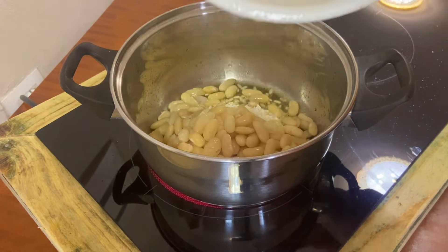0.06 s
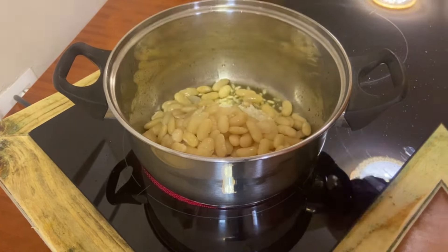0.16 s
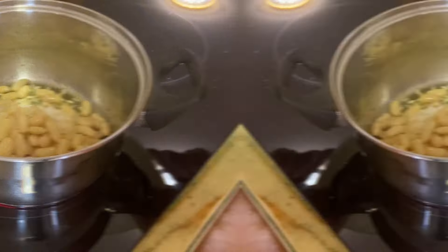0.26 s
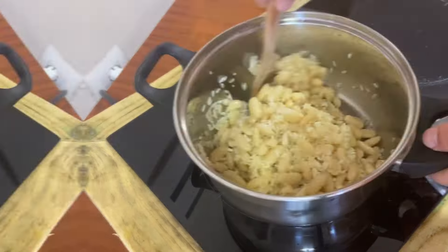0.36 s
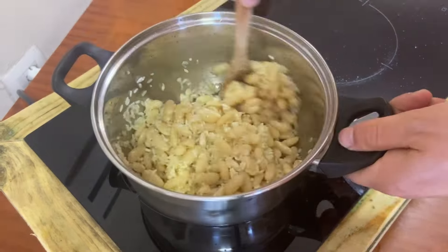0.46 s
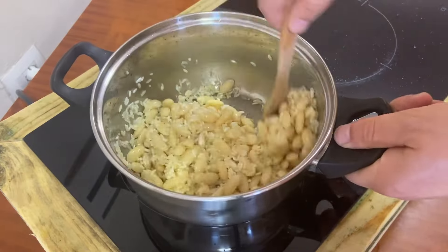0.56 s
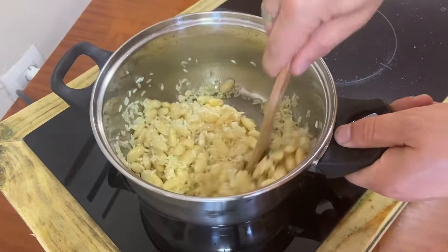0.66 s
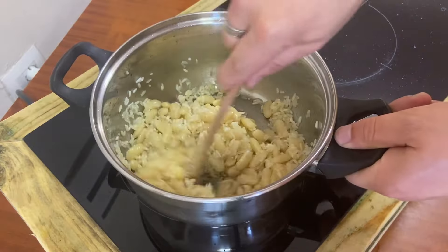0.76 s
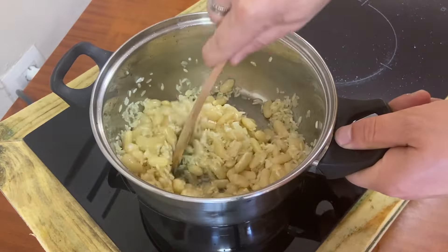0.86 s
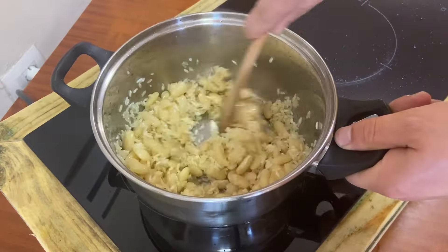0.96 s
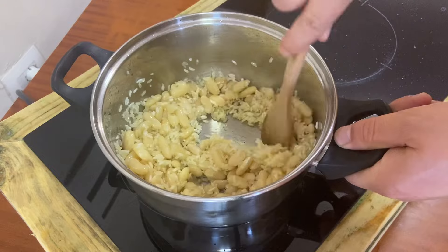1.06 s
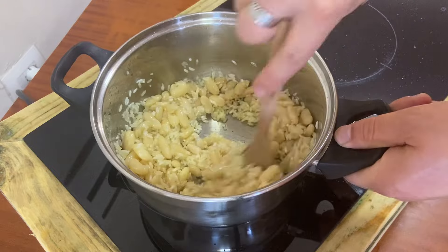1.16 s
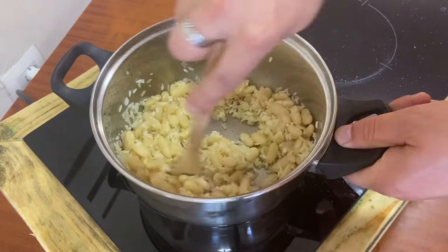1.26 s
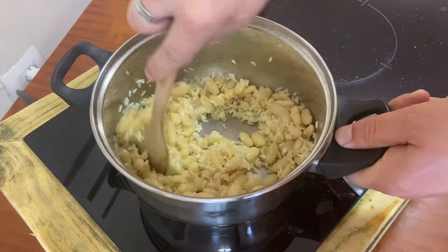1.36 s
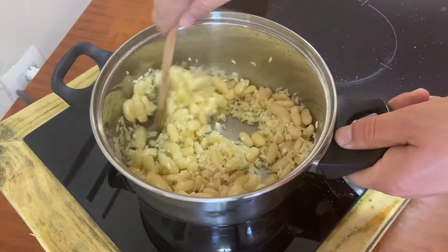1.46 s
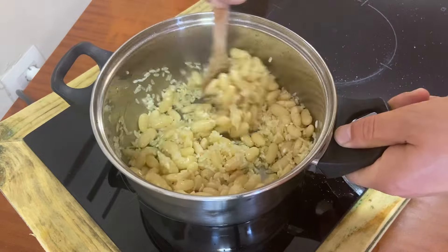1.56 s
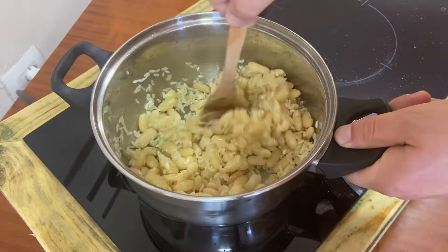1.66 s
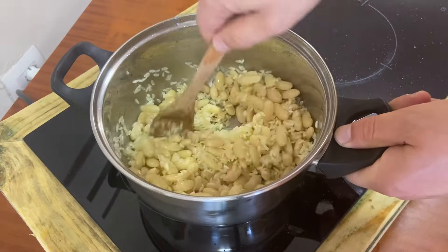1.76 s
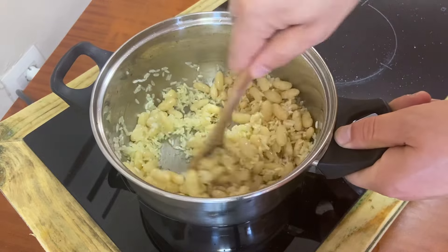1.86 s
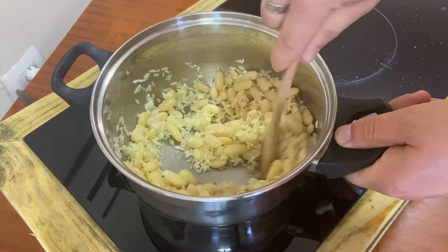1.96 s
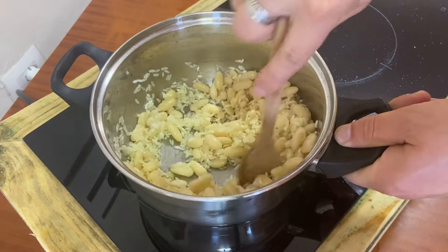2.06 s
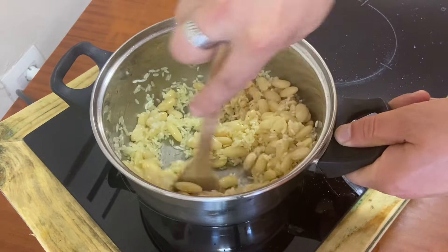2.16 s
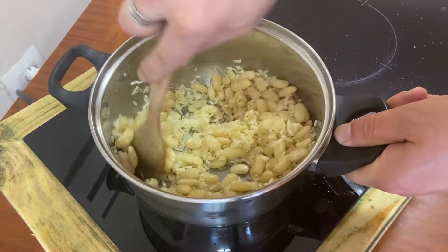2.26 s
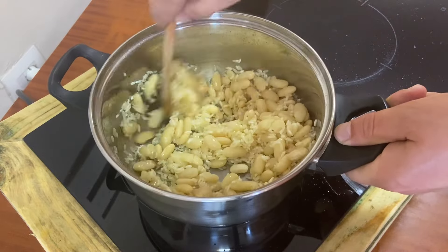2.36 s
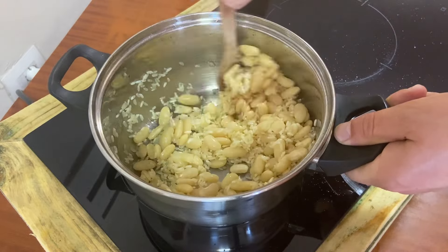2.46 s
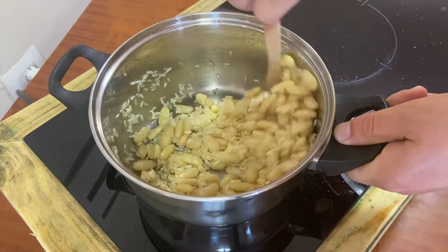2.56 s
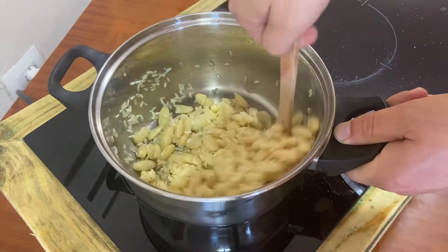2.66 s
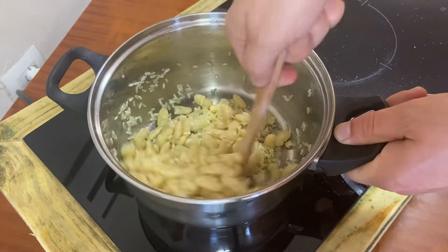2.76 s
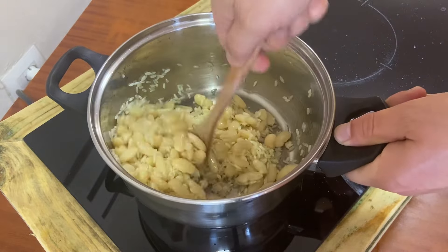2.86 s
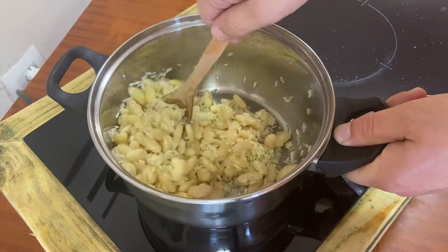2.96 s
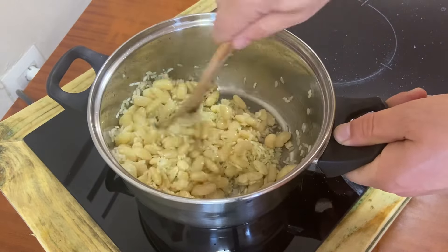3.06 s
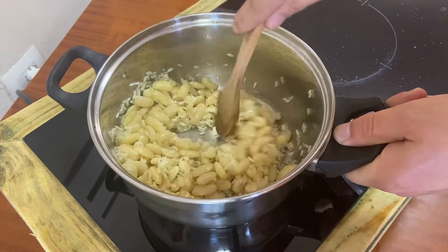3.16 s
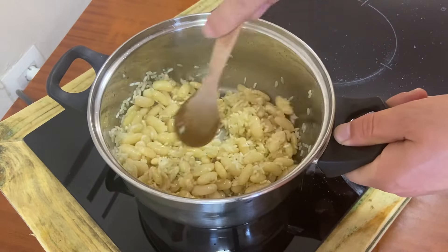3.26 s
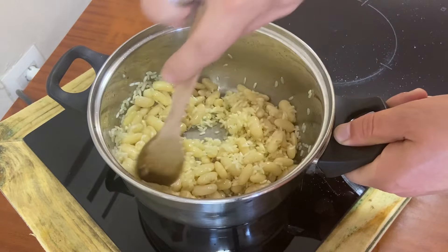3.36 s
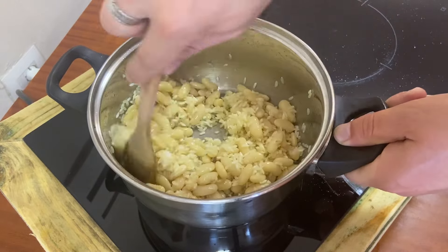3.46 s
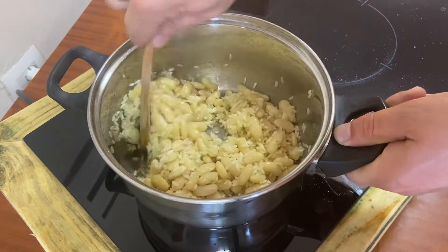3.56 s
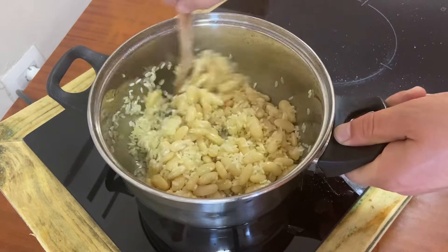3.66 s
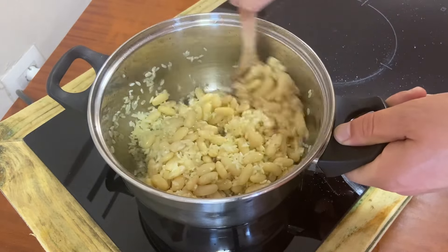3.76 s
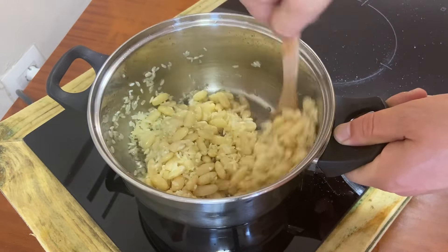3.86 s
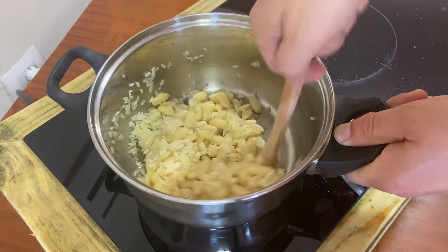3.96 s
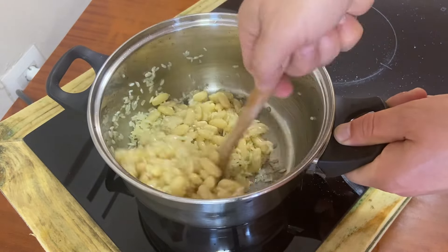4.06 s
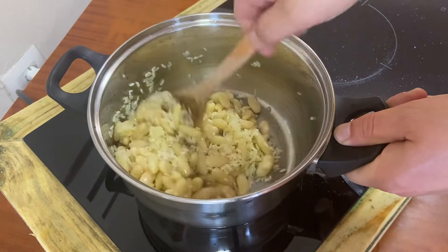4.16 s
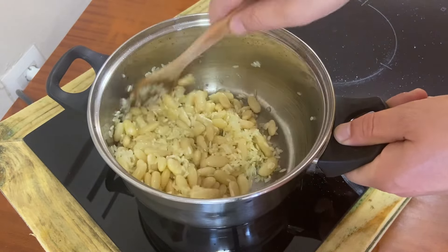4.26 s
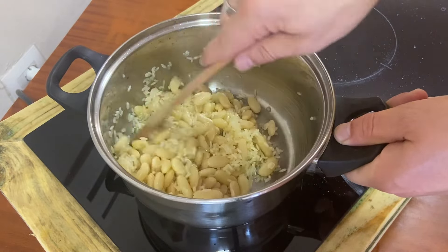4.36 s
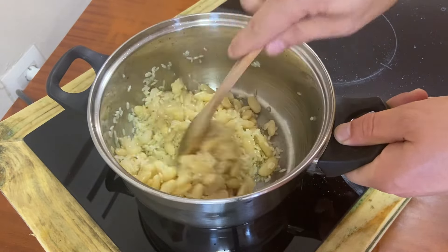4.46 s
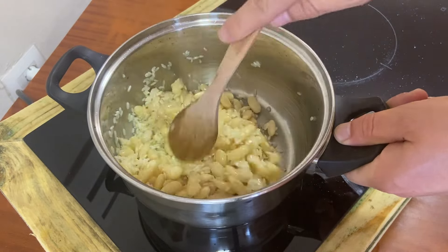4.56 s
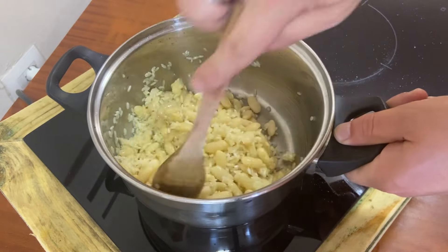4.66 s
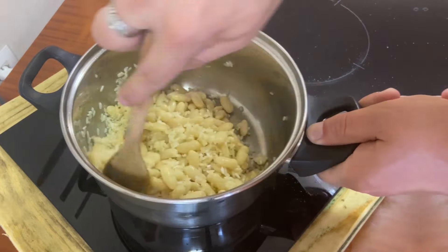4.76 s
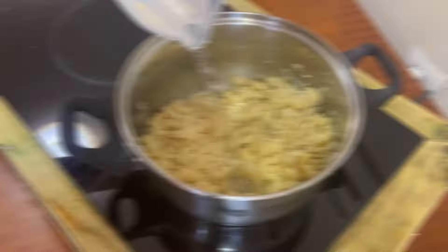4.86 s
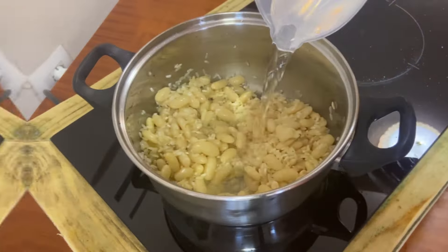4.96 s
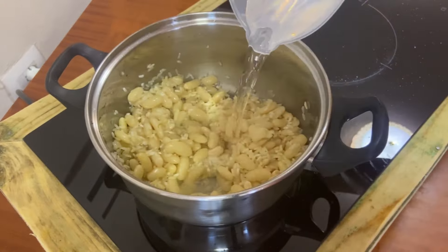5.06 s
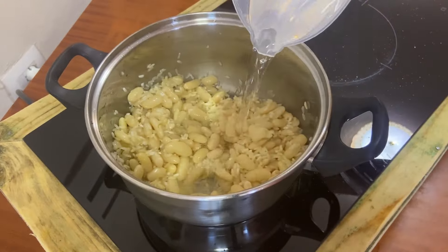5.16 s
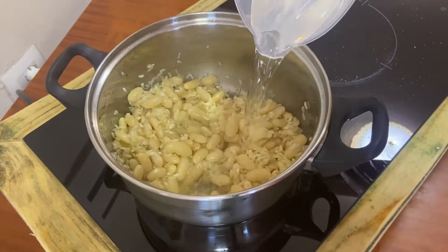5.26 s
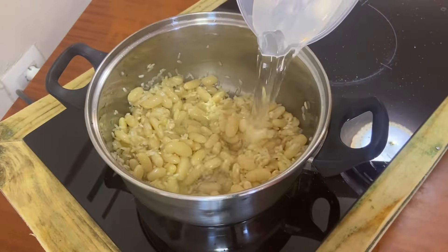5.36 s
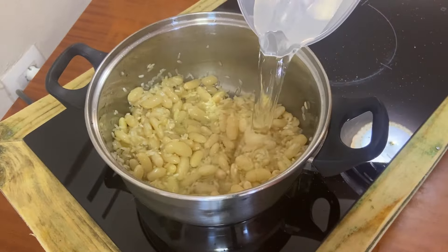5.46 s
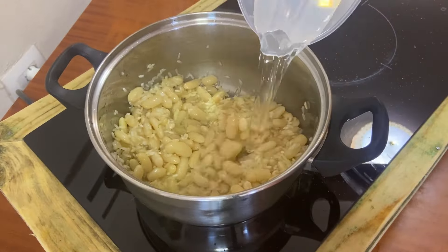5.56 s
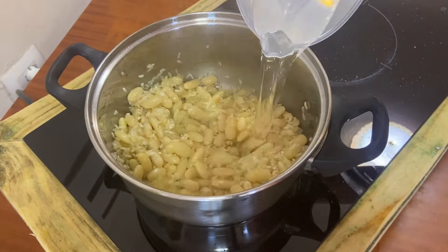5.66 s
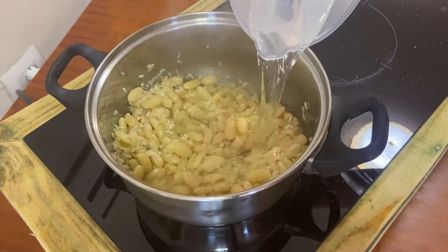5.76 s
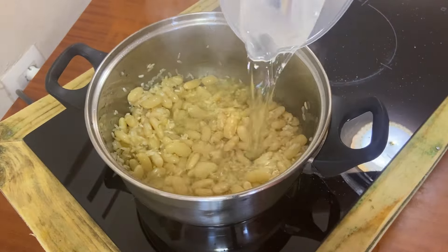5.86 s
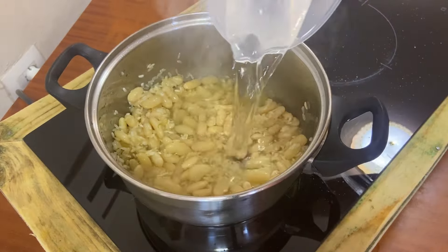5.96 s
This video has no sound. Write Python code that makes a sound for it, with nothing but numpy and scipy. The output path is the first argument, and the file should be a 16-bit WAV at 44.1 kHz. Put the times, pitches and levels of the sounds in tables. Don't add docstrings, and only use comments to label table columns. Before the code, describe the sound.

Close-up frying crackle in a metal pot with ringing wooden spoon taps, cut abruptly to water flashing into a fierce, fading steam hiss.

```python
import sys
import numpy as np
from scipy import signal
from scipy.fft import rfft, irfft, next_fast_len
from scipy.io import wavfile
from scipy.ndimage import uniform_filter1d, map_coordinates

SR = 44100
rng = np.random.default_rng(int(sys.argv[2]) if len(sys.argv) > 2 else 0)


def amplitude_ratio(level_db):
    exponent = np.asarray(level_db, float) / 20
    return 10 ** exponent


def unload_wav(signal):
    wavfile.write(
        sys.argv[1],
        SR,
        np.round(np.clip(np.atleast_2d(signal).T, -1, 1) * 32767).astype(np.int16),
    )


N = 265129
TIME = np.arange(N) / SR


def unit(x):
    return x / np.sqrt(np.mean(x ** 2) + 1e-20)


def curve(rows):
    s, db = np.transpose(rows)
    return np.interp(TIME, s, db)


def impulses(s, gain):
    return np.bincount(np.round(s * SR).astype(int), gain, N)


def wobble(rate):
    return map_coordinates(rng.standard_normal(int(N * rate / SR) + 4), [np.arange(N) * rate / SR])


def filtered(x, response):
    m = next_fast_len(N + 8192)
    return irfft(rfft(x, m) * response(np.fft.rfftfreq(m, 1 / SR)), m)[..., :N]


def coloured(x, spectrum):
    f, db = np.transpose(spectrum)
    return unit(filtered(x, lambda hz: amplitude_ratio(np.interp(np.log(hz + 1), np.log(f + 1), db))))


def resonances(modes, hz):
    total = 0
    for k, (centre, width, db) in enumerate(modes):
        damping = 1j * hz * width
        total = total + (-1) ** k * amplitude_ratio(db) * damping / (centre ** 2 - hz ** 2 + damping)
    return total


def patchy(depth_db):
    z = signal.stft(rng.standard_normal(N), nperseg=256)[2]
    field = uniform_filter1d(rng.standard_normal(z.shape), size=8, axis=0)
    field = uniform_filter1d(field, size=10, axis=1)
    return signal.istft(z * amplitude_ratio(depth_db * unit(field)), nperseg=256)[1][:N]


def bursts(s, gain, hz, cycles, size):
    k = np.arange(size)
    turns = np.clip(hz, 300, 15500)[:, None] * k / SR
    wave = np.sin(2 * np.pi * turns) * (1 - np.exp(-turns / 0.28)) * np.exp(-turns / cycles)
    wave *= (gain / np.abs(wave).max(axis=1))[:, None]
    at = np.round(s * SR).astype(int)[:, None] + k
    return np.bincount(at.ravel(), wave.ravel(), N + size)[:N]


def crackle(count, centre_hz, spread, scatter_db, cycles):
    u, g = rng.random((count, 2)), rng.standard_normal(count)
    gain = amplitude_ratio(-scatter_db * np.log(1 - .98 * u[:, 1]))
    return unit(bursts(u[:, 0] * N / SR, gain, centre_hz * np.exp(spread * g), cycles, size=64))


# time in seconds, sizzle level in dB.
FRYING = [(0, -47.5), (0.11, -52), (0.325, -45), (0.39, -44.5), (0.41, -50), (0.66, -52), (1.05, -47),
          (1.2, -51), (1.48, -47), (1.98, -49.5), (2.57, -50), (2.7, -53), (3.15, -50.5), (3.93, -50.5),
          (4.07, -54.5), (4.38, -52.5), (4.42, -51), (4.89, -53.5)]


def frying():
    sizzle_db = curve(FRYING)
    clumps = amplitude_ratio(0.77 * wobble(21.99) + 1.64 * wobble(70))
    return fine_sizzle(sizzle_db, clumps) + large_bubbles(sizzle_db, clumps) + pops(sizzle_db)


# frequency in Hz, level in dB per Hz.
OIL = [(900, -52), (1500, -11), (2500, -13), (3300, -7.5), (5000, 0), (7400, 5), (9000, 0.5), (13000, 2),
       (15800, -3.5)]


def fine_sizzle(sizzle_db, clumps):
    hiss = coloured(patchy(depth_db=0.0), OIL)
    grains = crackle(count=13000, centre_hz=7860, spread=0.51, scatter_db=4.0, cycles=0.87)
    grains = coloured(grains, [(800, -29), (2500, -6), (7000, 0.5), (15000, 4.0)])
    return amplitude_ratio(sizzle_db + 1.5) * unit(amplitude_ratio(1) * (clumps ** 0.5 * hiss + clumps * grains))


# frequency in Hz, level in dB per Hz.
DEEP_COLOUR = [(400, -15), (800, -26), (1500, 0.5), (2600, 2.5), (4500, 5), (9000, -20)]
DEEP_DB, DEEP_FOLLOWS = -64.5, 0.48
UNSTIRRED_DB = 10


def large_bubbles(sizzle_db, clumps):
    level_db = DEEP_DB + DEEP_FOLLOWS * (sizzle_db - sizzle_db.mean()) + UNSTIRRED_DB * (TIME < CUTS[0][1])
    noise = coloured(patchy(depth_db=2.5), DEEP_COLOUR)
    large = crackle(count=3000, centre_hz=2230, spread=0.39, scatter_db=-1.5, cycles=0.33)
    return amplitude_ratio(level_db - 2.5) * unit(clumps ** 0.093 * noise + amplitude_ratio(-6.5) * large)


SMALL_POPS, SMALL_HZ, SMALL_SPREAD = 320, 8200, .3
SMALL_DB, SMALL_SCATTER_DB = 15.5, 2.0
SMALL_RING, LOW_SOFT_DB = 1.7, 3.5
# time in
# seconds, peak in dB, pitch in Hz.
BIG_POPS = [(0.0154, -17, 8000), (0.0251, -27, 12000), (0.06, -33, 2300), (0.0983, -28, 5200),
            (0.1118, -29, 9500), (0.1181, -31, 7900), (0.1241, -31, 4700), (0.1503, -30, 5000),
            (0.1527, -22, 10800), (0.1546, -23, 7100), (0.1585, -18, 9000), (0.2002, -31, 6900),
            (0.2166, -28, 8400), (0.24, -28, 4000), (0.251, -18, 7100), (0.2933, -28, 7700),
            (0.3194, -31, 7200), (0.3548, -22, 5800), (0.3572, -26, 8600), (0.362, -25, 8400),
            (0.3721, -15, 8300), (0.3745, -22, 7700), (0.3924, -28, 7500), (0.4, -30, 6400),
            (0.4379, -30, 11100), (0.4637, -32, 6900), (0.5177, -36, 3000), (0.5247, -30, 8100),
            (0.5367, -25, 10500), (0.6338, -31, 11000),
            (0.6888, -28, 10300), (0.7166, -28, 7100), (0.7876, -26, 9000), (0.926, -29, 6200),
                (0.9974, -27, 8300), (1.1522, -40, 2000), (1.3978, -22, 6900), (1.4014, -26, 6600),
                (1.4996, -27, 6800), (1.567, -28, 7000), (1.5822, -28, 8500), (1.6959, -28, 7000),
                (1.8497, -27, 10800), (2.1198, -26, 8600), (2.2324, -22, 9000), (2.501, -27, 8300),
                (2.5182, -28, 8900), (2.5739, -28, 6900), (2.7093, -29, 6900), (2.8163, -30, 8100),
                (2.845, -27, 8100), (3.1102, -29, 6000), (3.5484, -29, 7900), (3.5688, -29, 6500),
                (3.7219, -25, 9100), (4.1136, -28, 12300), (4.2019, -30, 7400), (4.2853, -28, 10700),
                (4.3011, -29, 8100), (4.5586, -27.5, 8300)]


def pops(sizzle_db):
    when = rng.random(SMALL_POPS) * CUTS[1][0]
    size, pitch = rng.standard_normal((2, SMALL_POPS))
    small_db = sizzle_db[(when * SR).astype(int)] + SMALL_DB + SMALL_SCATTER_DB * size
    small_db += LOW_SOFT_DB * np.minimum(pitch, 0)
    small = np.transpose([when, small_db, SMALL_HZ * np.exp(SMALL_SPREAD * pitch)])
    s, db, hz = np.vstack([BIG_POPS, small]).T
    cycles = 0.95 * np.exp(0.35 * rng.standard_normal((len(s), 1)))
    cycles[-SMALL_POPS:] *= SMALL_RING
    ringing = bursts(s, amplitude_ratio(db - 0.5), hz, cycles, size=96)
    t = np.arange(SR // 100) / SR
    splash = signal.fftconvolve(impulses(s, amplitude_ratio(db - 7.0)), amplitude_ratio(-60 * t / 0.007))[:N]
    return ringing + splash * coloured(rng.standard_normal(N), OIL)


def spoon():
    return wall_taps() + base_thuds() + scrape()


RING_TIME = np.arange(SR // 4) / SR
SCATTER_DB, DETUNE = 1.3, .015
PUSH = 0.00012
# frequency in Hz, level in dB, t60 in seconds.
WALL = [(645, 2, 0.04), (757, 1.5, 0.032), (958, -14.5, 0.1), (1348, -6.5, 0.027), (2030, -14.5, 0.016),
        (2790, -14, 0.0033)]
# time in seconds, peak in dB, hardness in dB an octave.
TAPS = [(0.354, -46.5, -10), (0.634, -48, 17), (0.78, -40.5, -18), (0.928, -45.5, -31), (0.983, -43, 17.5),
        (1.027, -53, -9), (1.269, -45.5, 6), (1.499, -44.5, 10), (1.977, -47, 11), (2.197, -41, 7),
        (2.218, -44, 9), (2.343, -38.5, 8), (2.373, -29, 2.5), (2.47, -37.5, 5), (2.869, -50, 12),
        (3.101, -49, -6), (3.42, -42.5, 15), (3.634, -33.5, 2), (3.749, -42.5, 3), (3.869, -38.5, -31),
        (3.915, -47, 10), (4.113, -48.5, 14), (4.262, -47.5, 15.5), (4.67, -32.5, 16.5)]


def wall_taps():
    out, t = np.zeros(N + SR), RING_TIME
    push = 0.5 * (1 - t / PUSH) * np.exp(-t / PUSH)
    for s, db, hard_db in TAPS:
        ring = np.zeros(len(t))
        for hz, level, t60 in WALL:
            level_db = level + SCATTER_DB * rng.standard_normal() + hard_db * np.log2(hz / 700)
            pitch = hz * (1 + DETUNE * rng.standard_normal())
            ring += amplitude_ratio(level_db - 60 * t / t60) * np.sin(2 * np.pi * pitch * t)
        out[round(s * SR):][:len(t)] += amplitude_ratio(db - 9) * (ring * (1 - np.exp(-t / 0.00089)) + push)
    return out[:N]


THUD_ROUGH_DB = 2.5
# frequency in Hz, level in dB, t60 in seconds.
BASE = [(224, -2, 0.24), (264.3, -1, 0.11), (341.4, 0.5, 0.14), (454, -5.5, 0.066)]
# time in seconds, peak in dB, pitch lift in dB an octave.
THUDS = [(0.355, -42, 5), (0.385, -58, 19), (0.706, -51, 9), (0.984, -60, 8), (1.025, -55, 12),
         (1.269, -50.5, 12), (1.299, -54, 0), (1.499, -52, 0), (1.977, -54, 6), (2.197, -56.5, 1),
         (2.218, -53.5, 11), (2.343, -53.5, -3), (2.374, -72, 2), (2.681, -54, 9), (3.254, -57, 7),
         (3.397, -52.5, -1), (3.42, -54.5, 19), (3.438, -49.5, -23), (3.869, -50.5, 18), (4.112, -62, 13),
         (4.262, -50.5, -13), (4.67, -38.5, 4), (4.704, -54, 8)]


def base_thuds():
    out, t = np.zeros(N + SR), RING_TIME
    swell = (1 - np.exp(-t / 0.0085)) * (0.52 + np.exp(-t / 0.0094))
    rough_db = THUD_ROUGH_DB * wobble(45)
    for s, db, lift_db in THUDS:
        start, ring = round(s * SR), np.zeros(len(t))
        for hz, level, t60 in BASE:
            level_db = level + SCATTER_DB * rng.standard_normal() + lift_db * np.log2(hz / 280)
            ring += amplitude_ratio(level_db - 60 * t / t60) * np.sin(2 * np.pi * hz * t)
        out[start:][:len(t)] += amplitude_ratio(db + 2.5 + rough_db[start:][:len(t)]) * ring * swell
    return out[:N]


DRAG_DB, DRAG_T60 = -24, .14
# time in seconds, level in dB.
SCRAPE = [(0, -64), (0.15, -76), (0.45, -63.5), (0.75, -66.5), (1.05, -67), (1.2, -65.5), (1.6, -70),
          (1.95, -62.5), (2.13, -71), (2.38, -64.5), (2.7, -66.5), (3.1, -75), (3.27, -70), (3.36, -71.5),
          (3.7, -63.5), (4.0, -66), (4.5, -75), (4.85, -69.5)]


def scrape():
    s, db, _ = np.transpose(TAPS)
    drag = signal.fftconvolve(impulses(s, amplitude_ratio(db + DRAG_DB)), amplitude_ratio(-60 * RING_TIME / DRAG_T60))[:N]
    body = [(hz, 3.6 / t60 * 2.44, level) for hz, level, t60 in BASE + WALL[:2]]
    lumps = amplitude_ratio(2.6 * wobble(24.92)) * rng.standard_normal(N)
    return (amplitude_ratio(curve(SCRAPE)) + drag) * unit(filtered(lumps, lambda hz: resonances(body, hz)))


SPLASH_DB, SPLASH_S = 8, .08
# time in seconds, hiss level in dB.
STEAM = [
    (4.93, -40),
    (4.97, -37.5),
    (5.084, -39),
    (5.222, -39.5),
    (5.49, -38.5),
    (5.53, -41),
    (5.794, -44.5),
    (5.91, -50),
    (6.0, -53),
]


def steam():
    hiss_db, since = curve(STEAM), np.abs(TIME - CUTS[1][1])
    swing_db, splash_db = hiss_db + 40, SPLASH_DB * np.exp(-since / SPLASH_S)
    flow = vapour()
    return (hiss_and_fizz(flow, hiss_db, swing_db, since) + steam_jets(flow)
            + boil(swing_db, splash_db) + pour(since, splash_db))


# frequency in Hz, level in dB per Hz.
VAPOUR = [(1200, -13), (2000, -5.5), (3000, 0), (4200, 1), (7800, 5), (10000, 2.5), (13000, 1.5),
          (15800, -5.5)]


def vapour():
    rush = amplitude_ratio(0.19 * wobble(18) + 0.99 * wobble(90)) * coloured(patchy(depth_db=1.05), VAPOUR)
    spit = crackle(count=30000, centre_hz=5950, spread=0.706, scatter_db=3.5, cycles=2.0)
    return rush + amplitude_ratio(-4.5) * coloured(spit, [(1200, -17), (2500, -10.5), (7000, -3.5), (15000, 4.5)])


FIZZ_DB, FIZZ_GROWS = -39, 1.15
DRY_BASE_DB, DRY_PEAK_S = 1.5, 0.17


def hiss_and_fizz(flow, hiss_db, swing_db, since):
    fizz = filtered(flow, lambda hz: 1 / (1 + (7000 / (hz + 1)) ** 6))
    dry_db = DRY_BASE_DB * since / DRY_PEAK_S * np.exp(1 - since / DRY_PEAK_S)
    return amplitude_ratio(hiss_db) * unit(flow - fizz) + amplitude_ratio(FIZZ_DB + FIZZ_GROWS * swing_db + dry_db) * unit(fizz)


JET_S, JET_WIDTH = 0.039, 0.32
# time in seconds, peak in dB, pitch in Hz.
JETS = [
    (4.98, -42, 7500),
    (5.09, -44, 8800),
    (5.36, -50, 6500),
    (5.485, -48, 5070),
]


def steam_jets(flow):
    out = np.zeros(N)
    for s, db, hz in JETS:
        jet = unit(filtered(flow, lambda f: resonances([(hz, JET_WIDTH * hz, 0)], f) ** 2))
        out += amplitude_ratio(db) * np.exp(-((TIME - s) / JET_S) ** 2) * jet
    return out


BOIL_DB, BOIL_FOLLOWS = -47, 0.2
# frequency in Hz, level in dB per Hz.
BOIL = [(150, -61), (300, 2), (600, 1.5), (1300, 2), (2500, 0.5), (4000, -14), (8000, -58)]


def boil(swing_db, splash_db):
    churn = amplitude_ratio(1.0 * wobble(30)) * coloured(patchy(depth_db=1.0), BOIL)
    churn = filtered(churn, lambda hz: 1.53 + air_column(hz))
    return amplitude_ratio(BOIL_DB + BOIL_FOLLOWS * swing_db + splash_db - 5.5) * unit(churn)


POUR_DB, FILL_DB_PER_S = -72.5, 8


def pour(since, splash_db):
    drumming = coloured(patchy(depth_db=4.0), [(120, -27), (220, -8.0), (350, -1.0), (480, -14), (900, -24)])
    return amplitude_ratio(POUR_DB + FILL_DB_PER_S * since + 1.8 * splash_db + 11.5) * drumming


# frequency in Hz, width in Hz, level in dB.
POT_AIR = [(685, 133, 0.5), (1366, 158, 11.5), (2080, 510, -5.5), (2775, 260, 7), (3420, 500, -11.5)]


def air_column(hz):
    return resonances(POT_AIR, hz)


HUM_DB, JOLT_DB, JOLT_S = -75.5, 10.5, 0.05
# frequency in Hz, level in dB per Hz.
KITCHEN = [(13, -47), (22, -27), (70, -3.5), (162, -6.5), (231, -1), (296, -9), (347, -3.5), (500, -21),
           (650, -20), (1100, -120)]


def kitchen():
    stirred = np.clip(TIME - CUTS[0][1], 0, None) / JOLT_S
    return amplitude_ratio(HUM_DB + JOLT_DB * stirred * np.exp(1 - stirred)) * coloured(rng.standard_normal(N), KITCHEN)


FILLS, FILL_S, FILL_DB = 14, .06, -17


def treble_patches(x):
    out, level = np.zeros(N), np.sqrt(np.abs(uniform_filter1d(x ** 2, size=2048)))
    n = round(FILL_S * SR)
    for when, low, wide in rng.random((FILLS, 3)):
        low_hz = 4800 * 2 ** low
        edges = [low_hz, min(low_hz * (1.2 + wide), 15800)]
        sos = signal.butter(6, edges, "bandpass", fs=SR, output="sos")
        band = signal.sosfilt(sos, rng.standard_normal(n))
        out[int(when * (N - n)):][:n] += amplitude_ratio(FILL_DB) * unit(band * signal.windows.tukey(n, .6))
    return out * level * [[1], [-1]]


# fade start in seconds, return in seconds, join click in dB.
CUTS = [
    (0.323, 0.353, -10),
    (4.891, 4.921, -4),
]


def change_scenes(x):
    gate, joins = np.ones(N), np.zeros(N)
    for fade, back, click_db in CUTS:
        gate *= np.where(TIME < back, np.clip((fade + 0.011 - TIME) / 0.012, 0, 1) ** 2, 1)
        joins += (TIME >= back) * amplitude_ratio(click_db - 37.5 - 60 * np.abs(TIME - back) / 0.0043)
    return x * gate + joins


def scene():
    poured = TIME > CUTS[1][1]

    def pot(hz):
        no_bass = (1j * hz / (450 + 1j * hz)) ** 2
        return no_bass * (0.87 + air_column(hz))

    inside = filtered(np.where(poured, steam(), frying()), pot)
    return np.tile(inside + spoon() * ~poured + kitchen(), (2, 1))


def roll_off(x):
    return signal.sosfilt(signal.butter(12, 16730, fs=SR, output="sos"), x)


def record(dry):
    shots = change_scenes(dry + treble_patches(dry[0]))
    mix = filtered(shots, lambda hz: np.clip((15950 - hz) / 250, 0, 1))
    return roll_off(mix)


dry = scene()
out = record(dry)
unload_wav(out)
```